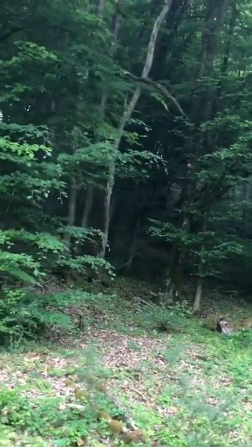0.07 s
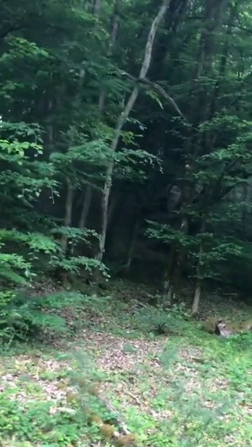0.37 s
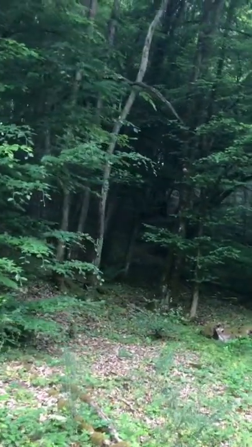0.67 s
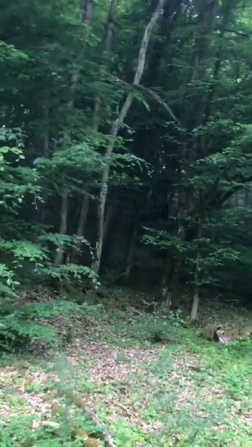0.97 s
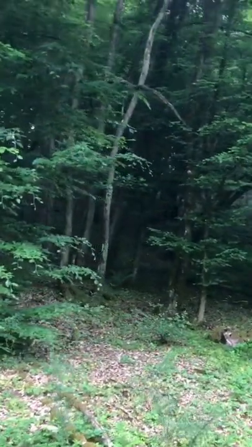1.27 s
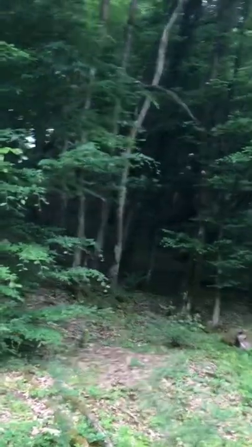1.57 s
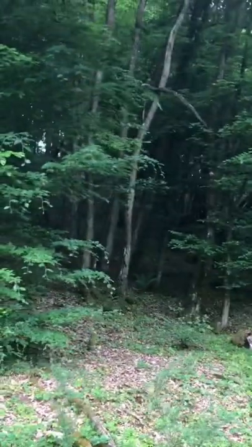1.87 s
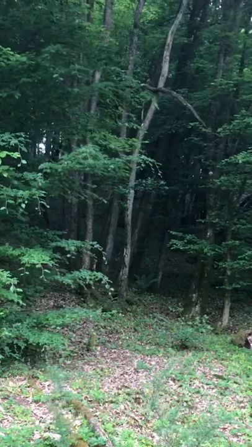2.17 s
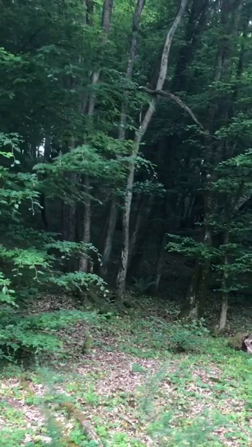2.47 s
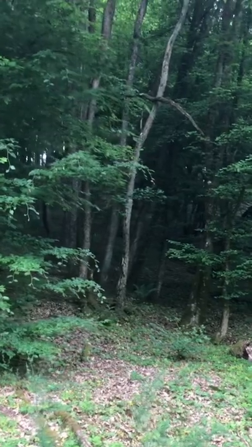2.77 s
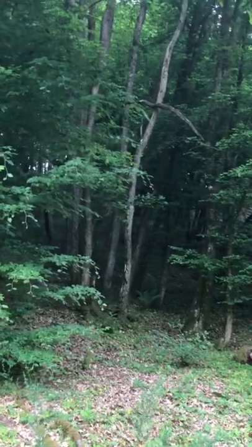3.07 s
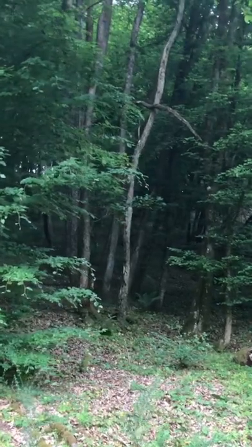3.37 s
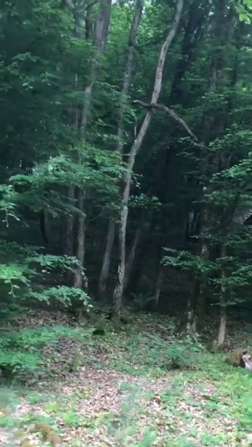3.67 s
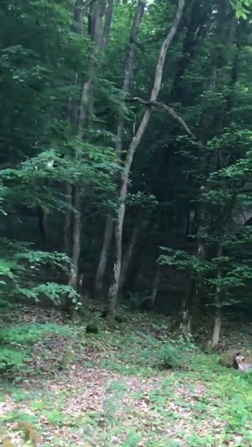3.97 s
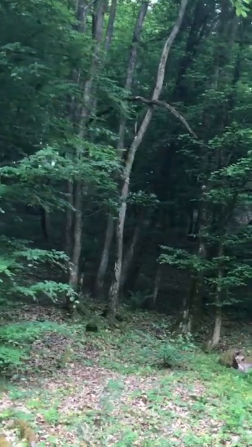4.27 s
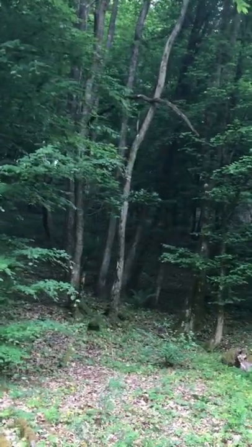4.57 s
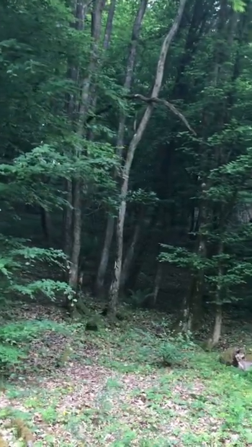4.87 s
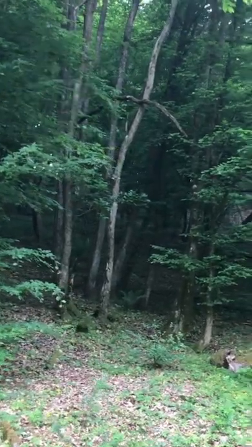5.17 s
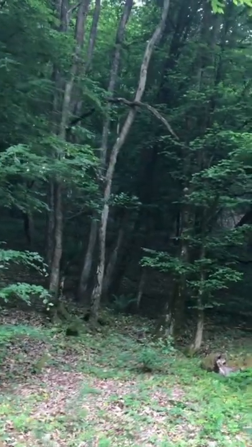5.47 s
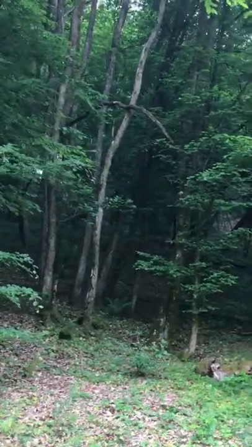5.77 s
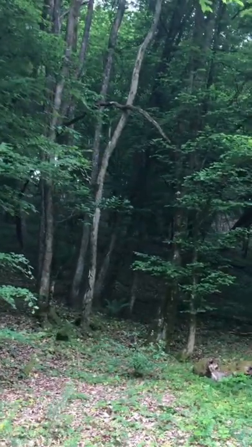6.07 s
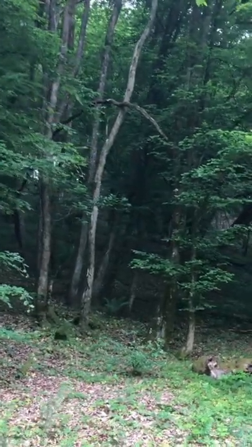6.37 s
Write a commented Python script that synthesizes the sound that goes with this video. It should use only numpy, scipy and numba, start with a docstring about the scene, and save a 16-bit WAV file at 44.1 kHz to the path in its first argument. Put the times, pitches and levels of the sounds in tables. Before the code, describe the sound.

A roe deer gives one loud, harsh bark that echoes through a wood, over songbirds whistling and trilling.

```python
"""Roe deer barking in a wood

One harsh bark: uneven slaps of the vocal folds ring the deer's throat and mouth, and the trunks
throw it back for over a second. Songbirds whistle and trill near and far, each note a gliding tone,
over a soft rustle of air. A dove coos faintly; fingers tap the case of the hand-held phone."""
import sys
import numpy as np
from scipy import signal
from scipy.fft import rfft, irfft, next_fast_len
from scipy.io import wavfile
from scipy.ndimage import uniform_filter1d
from numba import njit

SR = 44100
rng = np.random.default_rng(int(sys.argv[2]) if len(sys.argv) > 2 else 0)


def inscribe(sig):
    """Save sig as 16-bit PCM at rate SR to the path in sys.argv[1].

    A 1-D sig is mono; a 2-D sig holds one channel per row.
    Samples are clipped to [-1, 1] before scaling.
    """
    pcm = np.round(np.clip(np.atleast_2d(sig).T, -1, 1) * 32767)
    wavfile.write(sys.argv[1], SR, pcm.astype(np.int16))


N = 291501
TIME = np.arange(N) / SR

# The bed of still air. Each row: frequency in Hz, relative level in dB.
AIR_EQ = [(20, -29), (35, -13.5), (55, -1.5), (100, -1.5), (200, -2.5), (320, -6.5), (460, -2.5),
          (650, -10), (1000, -13), (1700, -16), (3000, -12.5), (6000, -16.5), (9000, -27.5), (15500, -32.5)]
# The wash of far birds. Each row: time in seconds, level in dB, centre pitch in Hz.
CHORUS_CURVES = [(0, -55, 3610), (.3, -71, 3818), (.5, -63.5, 3545), (.8, -71.5, 3808), (1.3, -59.5, 3424),
                 (1.75, -66.5, 3605), (2, -58, 3945), (2.65, -57, 3531), (3, -59.5, 3308), (3.6, -58, 3295),
                 (4.15, -99, 3965), (4.75, -70, 3904), (5, -62.5, 3310), (5.3, -68.5, 3007),
                 (5.55, -54, 3368), (6.2, -71, 4289), (6.4, -62, 4514), (6.6, -59, 3925)]
# Its tone. Each row: frequency in Hz, relative level in dB.
CHORUS_EQ = [(2000, -5.5), (2700, -2), (4300, -4), (6500, -2.5)]
# The far dove. Each row: start and length in seconds, pitch in Hz, level in dB.
DOVE_COOS = [(.9, .12, 460, -72), (1.22, .2, 505, -74), (1.42, .14, 505, -70), (1.54, .09, 475, -71),
             (2.34, .14, 490, -76), (4.55, .17, 470, -70), (5.44, .12, 490, -75)]
# A thin, sinking whistle. Each row: start and length in seconds, level in dB.
THIN_WHISTLES = [(0, .14, -64), (0.447, 0.363, -66), (1.127, 0.302, -66), (1.867, .42, -67.5),
                 (2.576, 0.428, -66)]
# Slides up or down. Each row: start and length in seconds, first and last pitch in Hz,
# bend (+ slides early, - late), level in dB.
SLURRED_NOTES = [(.002, 0.038, 4100, 3434, .2, -59), (0.157, 0.0518, 6515, 7810, -0.63, -60.5),
                 (0.387, 0.036, 2760, 4380, 0.29, -62), (0.427, 0.0174, 2938, 4286, 0.46, -61),
                 (0.96, .028, 3945, 3193, 0.31, -61), (1.036, .04, 4930, 4395, -.6, -68.5),
                 (1.068, .055, 3240, 2750, 0.11, -60.5), (1.073, 0.035, 4900, 4060, -.3, -64),
                 (1.141, 0.0227, 6600, 5630, .5, -61), (1.154, .022, 3147, 2540, -0.306, -60),
                 (1.218, 0.0214, 3608, 2815, -0.38, -58), (2.33, 0.224, 7126, 8020, -1.04, -70.5),
                 (2.393, 0.0486, 2240, 3923, -0.25, -53.5), (2.72, 0.072, 5380, 6050, -.6, -66),
                 (3.293, .037, 7300, 3750, 1, -59), (4.148, 0.0548, 5360, 4404, -1.09, -63),
                 (4.29, 0.0926, 9008, 7280, 0.57, -75.5), (4.464, 0.0596, 3454, 5597, -0.734, -59.5),
                 (4.619, 0.065, 3552, 5550, -.85, -58.5), (4.85, 0.0251, 5487, 3685, .3, -56),
                 (4.947, 0.105, 5993, 3650, -0.72, -58), (5.115, 0.1116, 6000, 3753, -0.426, -58),
                 (5.468, 0.0644, 7560, 5586, -.7, -60.5), (5.478, .13, 2613, 3880, -0.036, -52),
                 (5.49, 0.0547, 4310, 4914, 0.049, -58.5), (5.799, 0.044, 4370, 3998, -0.18, -56),
                 (5.875, 0.0171, 4540, 3650, 0.012, -55.5), (5.955, 0.0504, 5360, 6210, -0.022, -60),
                 (6.059, 0.0222, 3900, 2890, -.9, -59), (6.16, 0.064, 4820, 4315, 0.35, -53.5),
                 (6.31, 0.047, 6800, 3537, 0.078, -54)]
# Whistles that settle on a pitch. Each row: start and length in seconds, first and held pitch in Hz,
# direct level and echo send in dB.
HELD_NOTES = [(0.038, 0.1054, 3390, 3063, -55, -51), (1.81, 0.0634, 2357, 2672, -60, -63.5),
              (2.161, 0.027, 3963, 4192, -57, -72), (2.616, 0.128, 5354, 5427, -63, -64.5),
              (3.154, 0.081, 5300, 5148, -62, -68), (4.186, 0.19, 3609, 3555, -71.5, -83.5),
              (4.256, 0.157, 4160, 4169, -69, -82.5), (4.7, 0.0742, 5350, 5078, -66.5, -66.5),
              (4.718, 0.093, 7794, 7992, -75.5, -73), (4.739, 0.066, 7070, 6114, -56.5, -67),
              (4.858, 0.09085, 2679, 3131, -58.5, -51), (4.949, 0.167, 8053, 7810, -66, -69),
              (4.966, 0.1053, 2759, 2545, -58, -54.5), (5.051, 0.215, 3198, 3017, -67, -66.5),
              (5.182, 0.125, 7430, 7692, -61.5, -62), (5.231, 0.0483, 2387, 2300, -62.5, -65.5),
              (5.43, 0.054, 3390, 3473, -53, -50.5), (5.667, 0.0285, 4016, 4198, -56, -58.5),
              (5.736, 0.0161, 4053, 4390, -56.5, -53.5), (6.345, 0.064, 5370, 5280, -58.5, -75.5),
              (6.508, 0.0964, 4600, 4692, -52, -53)]
# Notes that rise and fall back. Each row: start and length in seconds, top pitch in Hz, level in dB.
ARCHED_NOTES = [(5.263, 0.0466, 7457, -58), (5.412, 0.0673, 8705, -73), (5.586, .135, 7326, -64),
                (5.781, 0.134, 7300, -65), (5.978, 0.112, 7398, -64)]
# Buzzy slides. Each row: start and length in seconds, first and last pitch in Hz, level in dB.
BUZZED_NOTES = [(.76, 0.155, 5700, 4910, -66.5), (1.602, 0.314, 4982, 4475, -64),
                (1.884, 0.111, 6300, 6896, -64), (2.43, 0.113, 4587, 5498, -57.5),
                (2.602, 0.096, 4600, 3048, -52), (2.69, .13, 3057, 2105, -61.5),
                (6.028, 0.1417, 7600, 6800, -58.5), (6.382, 0.087, 4230, 4180, -59)]
# Fingers on the phone. Each row: start in seconds, peak level in dB, ring pitch in Hz.
FINGER_TAPS = [(0.3342, -37.5, 1450), (.339, -53.5, 1200), (0.3481, -42, 1420), (0.435, -44, 1116),
               (0.51, -52, 1610), (1.283, -45, 905), (1.324, -45.5, 1560), (1.34, -46.5, 1370),
               (1.366, -45, 1150), (1.383, -43.5, 1094), (1.52, -48, 1100), (2.521, -51.5, 1110),
               (2.964, -47, 1180), (3.559, -51, 1046), (5.33, -41, 800), (5.486, -48, 767),
               (5.792, -53, 1010)]
# The shape of the bark. Each row: time in seconds, level in dB, vocal fold rate in Hz,
# mouth and throat tuning as multiples of their rest values, hiss against the voice in dB.
BARK_CURVES = [(3.676, -34.5, 178, 1.02, 1.173, -35), (3.7, -30.5, 177.8, 1.013, 1.144, -23.5),
               (3.75, -29.5, 181, 1.051, 0.995, -21.5), (3.82, -29, 188.7, 1.0276, 0.96, -21),
               (3.88, -30, 181.8, 1.0325, 0.952, -19.5), (3.95, -29.5, 174.9, 1.0015, 1.031, -23.5),
               (4, -32.5, 169.1, 0.948, 1.063, -25.5), (4.045, -33, 164.5, 0.907, 1.258, -36)]
# The deer's resonances at rest. Each row: centre and nominal width in Hz, relative level in dB.
MOUTH_MODES = [(624.7, 107.3, -1.5), (921, 190, -7.5), (1146.8, 146.4, 2.5), (1177, 96, -22),
               (1946.7, 150, -13.5)]
THROAT_MODES = [(2233, 253, -14), (3196, 154, -26), (3805, 270, -28)]
CHEST_MODES = [(181.5, 34.4, -3), (292.8, 41.6, 4.5), (457, 46, -9.5)]
# The hiss on the bark. Each row: frequency in Hz, relative level in dB.
HISS_EQ = [(2800, -34), (3500, -3), (4000, 3.5), (4400, -3), (4750, -10), (5100, -16), (5700, -13),
           (7000, -18.5), (8400, -17), (10000, -24), (15500, -21)]
# The wood's echo for each voice. Each row: frequency in Hz, gain in dB, seconds to fall by 60 dB.
CHORUS_ECHO = [(2000, 0.011, 0.537), (6012, 0.0098, 0.242)]
DOVE_ECHO = [(300, -13.5, 0.55), (900, 7.5, 0.6)]
SONG_ECHO = [(2000, 0, 1.99), (4000, 0.018, 1.26), (8000, 0.014, 1.08)]
BARK_ECHO = [(148.8, -4.5, 1.3), (394.8, -10.5, 3.3), (525, -4, 2.77), (654.3, -10, 1.847),
             (1199, -15, 2.42), (1425, -10, 1.81), (1882.1, -2, 1.773), (2919.7, -10.5, 1.31),
             (4500, -10.5, 1.3), (8100, -5, 0.38), (14980, -21, .3)]


def undb(db):
    """Decibels to gain."""
    return 10 ** (np.asarray(db) / 20)


def unit(x):
    """Scale to rms 1."""
    return x / np.sqrt(np.mean(x ** 2))


def curves(table):
    """Turn rows that start with a time into one automation curve per remaining column."""
    times, *columns = np.transpose(table)
    return [np.interp(TIME, times, column) for column in columns]


def colour(x, points):
    """Equalise along a curve of (Hz, dB) points."""
    hz, db = np.transpose(points)
    size = next_fast_len(len(x))
    bins_hz = np.maximum(np.fft.rfftfreq(size, 1 / SR), 1)
    gain = undb(np.interp(np.log(bins_hz), np.log(hz), db))
    return irfft(rfft(x, size) * gain, size)[:len(x)]


def wander(rate_hz, size=N):
    """Smooth random drift, spread near 1."""
    steps = np.arange(size) * rate_hz / SR
    return np.interp(steps, np.arange(size // 8 + 2), rng.standard_normal(size // 8 + 2))


def add(track, start_s, sound):
    """Mix a sound in at a time."""
    i = max(int(start_s * SR), 0)
    track[i:i + len(sound)] += sound[:max(N - i, 0)]


@njit
def bandpass(x, hz, width_hz):
    """State-variable band-pass with a moving centre, gain 1 there."""
    out, band, low = np.empty(len(x)), 0., 0.
    for i in range(len(x)):
        g, damping = np.tan(np.pi * hz[i] / SR), width_hz / hz[i]
        v = (band + g * (x[i] - low)) / (1 + g * (g + damping))
        band, low = 2 * v - band, low + 2 * g * v
        out[i] = damping * v
    return out


def resonance(x, hz, width_hz):
    """A steep resonance, steady or moving: the band-pass applied twice."""
    centre = hz * np.ones(len(x))
    return bandpass(bandpass(x, centre, float(width_hz)), centre, float(width_hz))


def cavity(x, modes, tuning=1):
    """Resonances that move together; alternate signs deepen the valleys between them."""
    return sum((-1) ** k * undb(db) * resonance(x, hz * tuning, np.sqrt(2) * width)
               for k, (hz, width, db) in enumerate(modes))


def near_trunks(x, first_s=0.004025, last_s=.03, db=-17, count=6):
    """The ground and the closest trunks add a few quick reflections."""
    out = x.copy()
    for place in rng.random(count):
        add(out, first_s + place * (last_s - first_s), undb(db) * x)
    return out / np.sqrt(1 + count * undb(db) ** 2)


def wood_echo(x, bands, build_s):
    """Scatter from countless trunks: a tail that builds, then dies at its own pace in each band."""
    hz, db, t60 = np.transpose(bands)
    f, t, noise = signal.stft(rng.standard_normal(2 * SR), SR, nperseg=512)
    db, t60 = (np.interp(np.log(f + 1), np.log(hz), column)[:, None] for column in (db, t60))
    fade = np.exp(-np.log(1000) * t / t60) * (1 - np.exp(-t / build_s))
    fade *= undb(db) / np.sqrt(2 * SR * np.mean(fade ** 2, axis=1, keepdims=True))
    tail = signal.istft(noise * fade, SR)[1]
    return signal.fftconvolve(x, tail)[:N]


def knots(count=6):
    """Where a contour's pitches lie, as shares of the note's length: closest near the two ends."""
    return (1 - np.cos(np.linspace(0, np.pi, count))) / 2


def slur(start_hz, end_hz, bend=0):
    """The contour of a slide; without bend it covers equal musical steps in equal times."""
    u = knots()
    return start_hz * (end_hz / start_hz) ** (u + bend * u * (1 - u))


def arch(top_hz, drop=.21, lean=0.1314):
    """A contour that shoots up, sinks a little and drops away; lean brings the top early."""
    v = 2 * knots() - 1
    return top_hz * (1 - drop * (v ** 2 + v ** 4) / 2 - lean * v * (1 - v ** 2) / 2)


def beats(start_s, every_s, count):
    """The times of an evenly repeated note."""
    return start_s + every_s * np.arange(count)


def whistle(length_s, contour, buzz_depth_hz=0., buzz_hz=140, waver=0.00776):
    """One bird note: a wavering tone glides along a contour in Hz; a buzz shakes its pitch fast."""
    u = np.linspace(0, 1, max(int(length_s * SR), 64))
    glide = np.polyval(np.polyfit(knots(len(contour)), contour, len(contour) - 1), u)
    shake = np.sin(2 * np.pi * buzz_hz * length_s * u + wander(120, len(u)))
    hz = glide * (1 + waver * wander(250.57, len(u))) + buzz_depth_hz * shake
    swell = np.sqrt(2 * np.abs(np.sin(np.pi * u))) * undb(2.72 * wander(93, len(u)))
    return swell * np.sin(2 * np.pi * np.cumsum(hz) / SR)


def air(db=-65.5, sway_db=-1.41):
    """A low rustle that sways slightly."""
    return unit(colour(rng.standard_normal(N), AIR_EQ)) * undb(db + sway_db * wander(1))


def far_chorus(spread=.14, glide=0.1188, length_s=.04, count=600):
    """Many distant chirps, smeared by the trees into a shimmering band."""
    db, centre_hz = curves(CHORUS_CURVES)
    chirps = np.zeros(N)
    for k, (late, pitch, slope, size) in enumerate(np.clip(rng.standard_normal((count, 4)), -2, 2)):
        i = int(np.clip((k + late / 2) / count, 0, 1) * (N - 1))
        contour = centre_hz[i] * np.exp(spread * pitch + glide * slope * np.linspace(-1, 1, 4))
        add(chirps, i / SR, undb(0.83 * size) * whistle(length_s, contour))
    wash = colour(0.22 * chirps + wood_echo(chirps, CHORUS_ECHO, build_s=0.026), CHORUS_EQ)
    running_rms = np.sqrt(uniform_filter1d(wash ** 2, SR // 5) + 1e-12)
    return undb(db) * wash / running_rms


def dove():
    """Soft low coos and their echo."""
    coos = np.zeros(N)
    for start, length, hz, db in DOVE_COOS:
        add(coos, start, undb(db) * whistle(length, hz * np.array([0.981, 1.01, 0.87, 0.975])))
    return coos + wood_echo(coos, DOVE_ECHO, build_s=0.016)


def note(start_s, length_s, contour, db, send_db):
    """A cue for one bird note; its echo send is relative to its direct level."""
    return start_s, length_s, contour, db, send_db


def twitter(centre_hz=5400, spread=0.15, glide=0.14, length_s=0.053, count=36):
    """Cues for faint stray slurs at chance times and pitches."""
    notes = []
    for k, (late, pitch, slope) in enumerate(np.clip(rng.standard_normal((count, 3)), -2, 2)):
        start = (k + late / 2) / count * N / SR
        hz = centre_hz * np.exp(spread * pitch)
        notes.append(note(start, length_s, slur(hz, hz * np.exp(glide * slope)), db=-76, send_db=-2))
    return notes


def warblers(settle_share=.16):
    """Cues for free song made of slurs, held whistles and arches."""
    slurs = [note(start, length, slur(first, last, bend), db, send_db=-4)
             for start, length, first, last, bend, db in SLURRED_NOTES]
    settle = np.exp(-knots() / settle_share)
    holds = [note(start, length, held + (first - held) * settle, db, send_db=echo_db - db)
             for start, length, first, held, db, echo_db in HELD_NOTES]
    arches = [note(start, length, arch(hz), db, send_db=-3) for start, length, hz, db in ARCHED_NOTES]
    return slurs + holds + arches


def callers():
    """Cues for three birds that each repeat one note: thin whistles, high hooks and low piping."""
    thin = [note(start, length, (7827, 7324, 6764, 6672), db, send_db=-1)
            for start, length, db in THIN_WHISTLES]
    hooks = [note(start, .031, (7121, 6010, 5433, 5390), db=-61.5, send_db=-1.5)
             for start in beats(1.563, every_s=.3465, count=7)]
    pipes = [note(start, 0.043, (1942, 1897, 1844, 1820), db=-69, send_db=-8)
             for start in beats(1.107, every_s=.173, count=4)]
    return thin + hooks + pipes


def finch(trill_start_s=1.225, trill_rate_hz=18.1, syllables=11, chip_lead_s=.032):
    """Cues for a trill, a flick up and a slur down per syllable, then steep sweeps with chips between."""
    flick_hz, fall_hz = np.array([3845, 4422, 5430, 6020]), np.array([4718, 4347, 3500, 2690])
    tunings = 1 + 0.03995 * rng.standard_normal(syllables)
    trill = []
    for start, tuning in zip(beats(trill_start_s, 1 / trill_rate_hz, syllables), tunings):
        trill.append(note(start + 0.0055, .022, tuning * flick_hz, db=-62, send_db=-2.5))
        trill.append(note(start + 0.021, .024, tuning * fall_hz, db=-63.5, send_db=-2.5))
    starts = beats(1.844, every_s=.146, count=4)
    sweeps = [note(start, .041, (6019, 4080, 2844, 2056), db=-51, send_db=-3) for start in starts]
    chips = [note(start - chip_lead_s, 0.017, (3670, 3890, 3840, 3825), db=-50, send_db=-6)
             for start in starts[1:]]
    return trill + sweeps + chips


def songbirds(buzz_send_db=-1):
    """Play the cues and the buzzy slides; each note arrives straight and through the trees."""
    direct, send = np.zeros(N), np.zeros(N)
    for start, length, contour, db, send_db in finch() + callers() + warblers() + twitter():
        tone = undb(db) * whistle(length, contour)
        add(direct, start, tone)
        add(send, start, undb(send_db) * tone)
    for start, length, first, last, db in BUZZED_NOTES:
        buzz = undb(db) * whistle(length, slur(first, last), buzz_depth_hz=345.6)
        add(direct, start, buzz)
        add(send, start, undb(buzz_send_db) * buzz)
    return near_trunks(direct, last_s=.04, db=-17.5) + wood_echo(send, SONG_ECHO, build_s=0.0032)


def handling(ring_cycles=0.714, rattle_gain=0.1285, rattle_s=0.0092,
             thud_at_s=5.484, thud_hz=165, thud_db=-58, thud_decay_s=0.021):
    """Finger taps ring the phone's case for a cycle or two; one shift of grip thuds."""
    out, t = np.zeros(N), np.arange(SR // 10) / SR
    for start, db, hz in FINGER_TAPS:
        age = t * hz / ring_cycles
        ring = 2 * np.e * age * np.exp(-2 * age) * np.sin(2 * np.pi * hz * t)
        scrape = unit(resonance(rng.standard_normal(len(t)), hz, width_hz=1.29 * hz))
        add(out, start, undb(db) * (ring + rattle_gain * scrape * np.exp(-t / rattle_s)))
    # the whole case moves, so it rings low
    thud = np.exp(-t / thud_decay_s) * np.sin(2 * np.pi * thud_hz * t)
    add(out, thud_at_s, undb(thud_db) * thud)
    return out


def fold_slaps(start_s, end_s, fold_hz, jitter=.13, shimmer_db=2.0):
    """The vocal folds slap shut, uneven in timing and strength: one click per slap."""
    slaps, at_s = np.zeros(N), start_s
    for late, size in rng.standard_normal((120, 2)):
        if at_s < end_s:
            i = int(at_s * SR)
            slaps[i] = undb(shimmer_db * np.tanh(size))
            at_s += max(1 + jitter * late, .5) / fold_hz[i]
    return slaps


def breath_rush(catch_s, lead_s=.041, db=-50):
    """A weak rush of air opens the call before the folds catch."""
    start = catch_s - lead_s
    swell = np.interp(TIME, [start, start + 0.0097, catch_s, catch_s + .01], [0.0079, 0.86, 1.81, 0.018])
    return undb(db) * swell * unit(resonance(rng.standard_normal(N), hz=750, width_hz=860))


def bark(start_s=3.676, end_s=4.048, puff_s=0.00337,
         rasp_db=-3, turbulence_db=-10, chest_db=-31, hiss_flutter=0.99):
    """Each slap and its puff of air ring the throat, which lengthens mid-call, and the closing mouth."""
    effort_db, fold_hz, mouth_tuning, throat_tuning, hiss_db = curves(BARK_CURVES)
    slaps = fold_slaps(start_s, end_s, fold_hz)
    gate = uniform_filter1d(1. * ((TIME > start_s) & (TIME < end_s)), 200)
    puffs = unit(signal.lfilter([1], [1, -np.exp(-1 / (puff_s * SR))], slaps))
    airflow = undb(rasp_db) * puffs + undb(turbulence_db) * unit(gate)
    source = unit(slaps) + airflow * rng.standard_normal(N)
    rush = breath_rush(start_s)
    voice = unit(cavity(source, MOUTH_MODES, mouth_tuning) + cavity(source, THROAT_MODES, throat_tuning))
    chest = unit(cavity(source, CHEST_MODES))
    hiss = unit(colour((hiss_flutter * puffs + unit(gate)) * rng.standard_normal(N), HISS_EQ))
    call = voice + undb(chest_db) * chest + undb(hiss_db) * hiss
    call *= np.sqrt(np.mean(gate))  # rms near 1 while the deer calls
    return undb(effort_db) * call + rush


def scene():
    """The mono mix: the deer and its echo over the birds, the hand and the air."""
    deer = near_trunks(bark())
    echo = wood_echo(deer, BARK_ECHO, build_s=0.012)
    return (undb(0.5) * deer + echo + songbirds() + far_chorus() + dove() + handling() + air())[None]


def record(dry):
    """The phone cuts the top end steeply."""
    top_hz = 15750
    return signal.sosfilt(signal.ellip(10, .2, 70, top_hz, fs=SR, output="sos"), dry)


dry = scene()
out = record(dry)
inscribe(out)
```